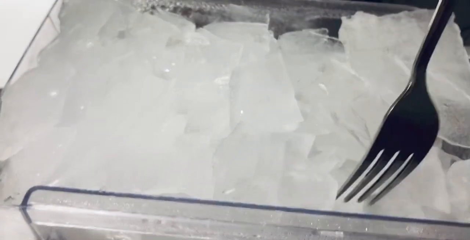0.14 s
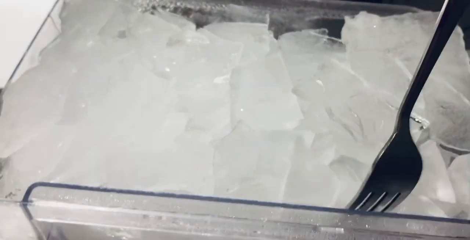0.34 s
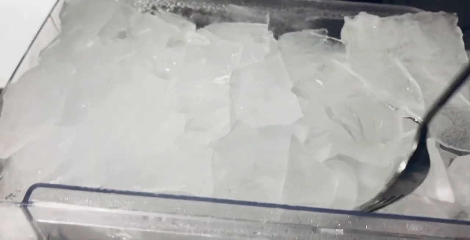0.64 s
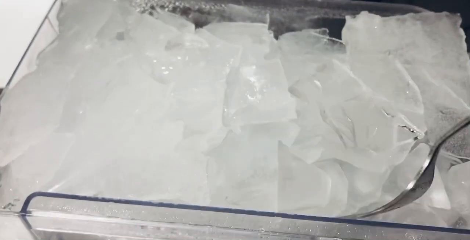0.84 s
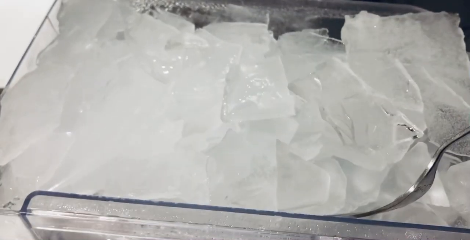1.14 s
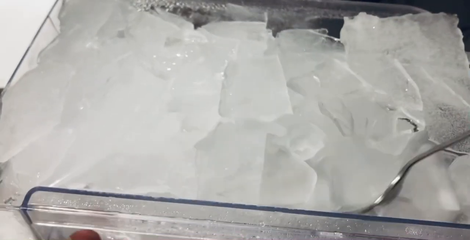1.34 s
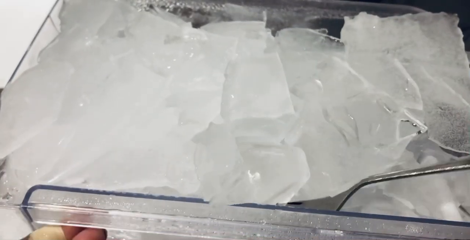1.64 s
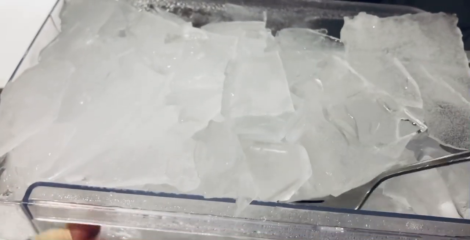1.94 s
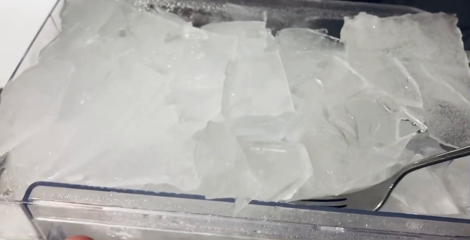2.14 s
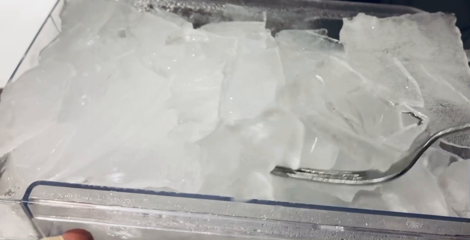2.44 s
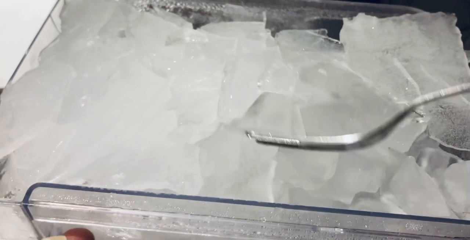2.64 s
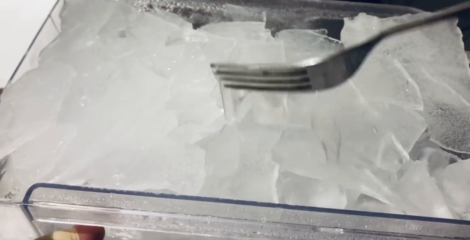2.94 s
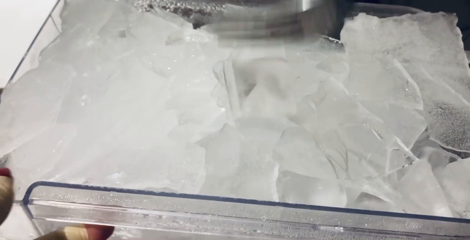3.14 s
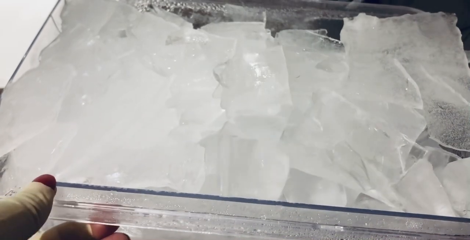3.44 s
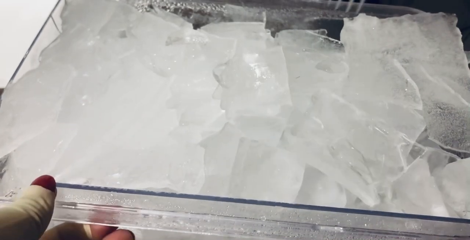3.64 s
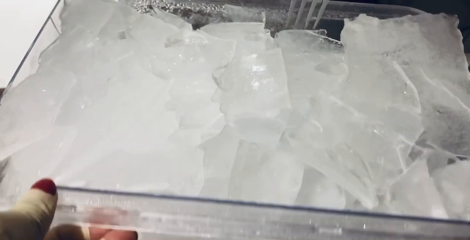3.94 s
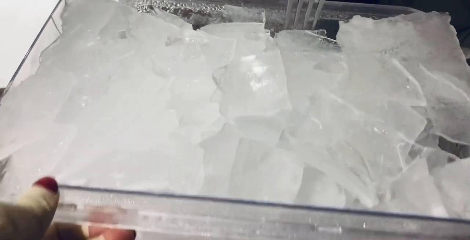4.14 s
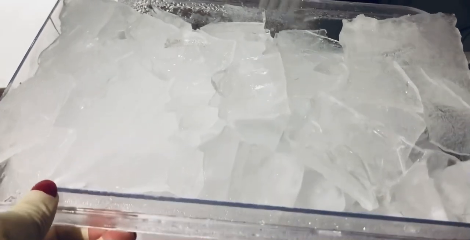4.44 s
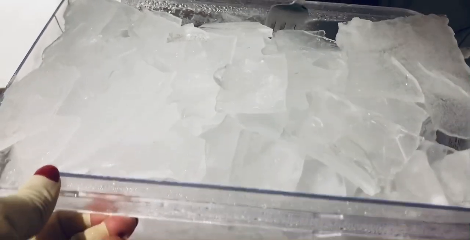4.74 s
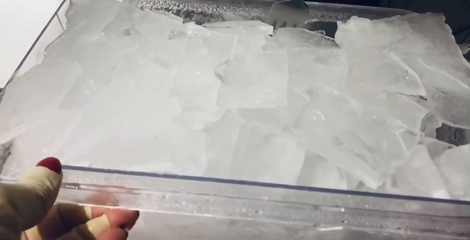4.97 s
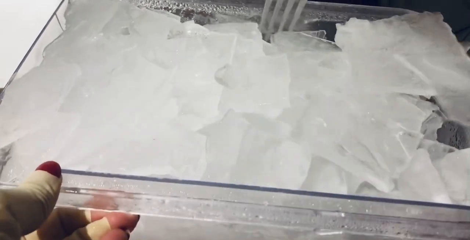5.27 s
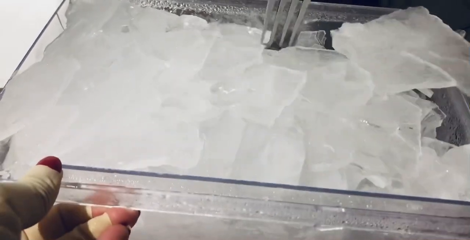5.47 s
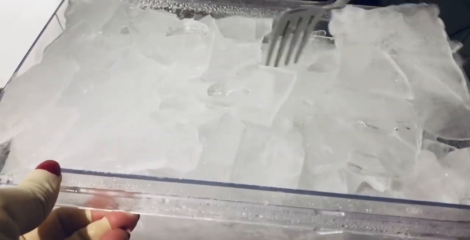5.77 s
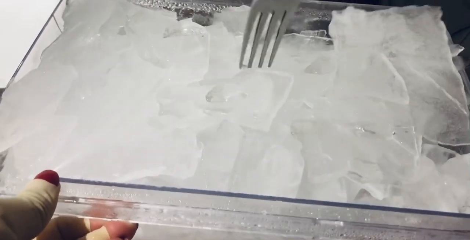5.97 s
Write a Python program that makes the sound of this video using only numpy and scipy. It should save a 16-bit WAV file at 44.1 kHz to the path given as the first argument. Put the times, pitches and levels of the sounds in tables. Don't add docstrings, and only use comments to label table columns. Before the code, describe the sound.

Ice snaps and grinds a hand's breadth from a phone microphone in a kitchen. A fork presses under slabs, cracking them in short uneven bursts with glassy pings and faint tine ringing. Loose pieces spill and thud on plastic, activity nearly stops, then loud crunching and scraping resumes to the end over faint refrigerator hum.

```python
import sys
import numpy as np
from scipy import signal
from scipy.fft import rfft, irfft
from scipy.io import wavfile

SR = 44100
rng = np.random.default_rng(int(sys.argv[2]) if len(sys.argv) > 2 else 0)


def digitize_waveform(pressure):
    field = np.atleast_2d(pressure).T
    bounded = np.clip(field, -1, 1)
    quanta = np.round(bounded * 32767).astype(np.int16)
    wavfile.write(sys.argv[1], SR, quanta)


def volts_from_decibels(level):
    exponent = np.asarray(level, float) / 20
    return 10 ** exponent


N = 269451

# f/Hz, width/Hz, level/dB
ICE_RESONANCES = [(4100, 440, 3.5), (6400, 810, 2.5), (9750, 170, 3.5), (12200, 470, -1), (16960, 4200, 5)]
# f/Hz, level/dB, t60/s
DRAWER_MODES = [(218, -24.5, 0.1), (347, -7, 0.014), (416.3, -2, 0.039), (477, 0.5, 0.027),
                (601.5, 3.5, 0.034), (623.5, 3, 0.034), (804, 4, 0.0042)]
# start t/s, end t/s, f/Hz, t60/s, level/dB
FORK_MODES = [(1.76, 2.17, 11090, .04, -27), (1.75, 2.0, 12500, .04, -25), (1.95, 2.2, 14850, .04, -24),
              (1.78, 1.82, 9400, .04, -28), (2.78, 2.87, 6430, .12, -34), (2.8, 2.87, 9880, .1, -36),
              (3.0, 3.09, 11910, .3, -30), (3.0, 3.07, 13150, .12, -29), (3.01, 3.06, 15750, .1, -28),
              (3.03, 3.09, 5050, .2, -33), (3.3, 3.5, 6400, .05, -33), (3.49, 3.6, 6400, .1, -33),
              (3.09, 3.6, 10000, .05, -30), (3.33, 3.6, 13200, .05, -28), (3.95, 4.22, 10700, .02, -27),
              (4.53, 4.61, 13200, .06, -30), (5.66, 6.0, 4650, .03, -32)]
# t/s, level/dB
WALL_GROAN = [
    (.3, -80),
    (.36, -61),
    (.54, -62),
    (.575, -44),
    (.62, -49),
    (.66, -62),
    (.95, -72),
]
GROAN_HZ = 203
# f/Hz, level per Hz/dB
ROOM_SPECTRUM = [(18, -40), (30, -10), (98, 3), (174, -22), (437, -26), (554, -31), (988, -38),
                 (16000, -56)]
ROOM_DB = -69
MICROPHONE_TOP_HZ = 15800
# t/s, f/Hz, level/dB
PING_EVENTS = [(0.625, 11250.0, -18), (1.222, 15160.0, -16.8), (1.261, 13210.0, -11), (1.307, 10000, -2),
               (1.31, 6410, -6), (1.335, 9350, -10), (1.35, 13210.0, -23.7), (2.646, 8700, -14),
               (3.655, 2530, -34), (5.085, 6440, -14), (4.483, 4100, -14), (2.286, 5750, -14),
               (2.402, 5130, -20.5), (2.461, 13900.0, -19), (2.81, 6400, -5), (2.81, 9860, -9),
               (3.091, 15400, -33), (3.609, 1480, -19), (3.609, 4290, -28), (3.611, 2840, -26),
               (3.632, 13000, -24), (3.565, 10900.0, -31), (3.854, 2700, -24), (4.541, 13210.0, -21),
               (4.812, 9170, -14.5), (6.101, 3030, -19)]
# t/s, level/dB, f/Hz
SLAB_DROPS = [(2.729, -12, 560), (3.61, -10.5, 363), (3.611, -13, 590), (3.611, -24, 970),
              (3.853, -13, 452), (3.858, -13.5, 324), (3.855, -23, 950), (.696, -24, 480), (0.76, -24, 720),
              (.759, -24, 450), (0.64, -33, 690), (1.022, -43, 740), (4.074, -33.5, 1100),
              (4.087, -39, 660), (4.9, -28, 480), (4.657, -22.5, 280), (4.499, -11, 340), (4.967, -15, 376)]
# t/s, level/dB
DRAWER_PUSH = [
    (0, -79),
    (.75, -52),
    (1.15, -62),
    (2.2, -67),
    (2.33, -54),
    (2.5, -60.5),
    (4.37, -64.5),
    (4.5, -41),
    (4.6, -62),
]
# t of most pressure/s, build-up/s,
# dying/s, grit level/dB, slab weight/dB
FORK_SHOVES = [(0.031, 0.008, 0.06, -34, 1.5), (.068, .012, .035, -35, 0), (0.271, 0.16, 0.07, -32.5, -3),
               (.616, 0.28, 0.11, -38.5, -7.5), (.701, 0.032, 0.18, -35, -11), (.92, 0.27, 0.094, -51, -6),
               (.46, .1, .2, -63, 0), (1.07, 0.13, 0.11, -57, -7.5), (1.165, 0.025, 0.45, -22, -13.5),
               (1.226, 0.045, 0.31, -17, -12.5), (1.335, 0.11, 0.048, -24.5, -8),
               (1.565, 0.13, 0.2, -30.5, -5.5), (1.772, 0.079, 0.087, -42, -7),
               (2.008, 0.16, 0.21, -46, -3), (2.301, 0.049, 0.13, -21.5, -8.5),
               (2.531, 0.067, 0.098, -35.5, -5.5), (2.809, 0.29, 0.053, -30, -6),
               (2.87, 0.055, 0.2, -47, -0.5), (3.2, 0.17, 0.47, -46.5, 3.5), (3.5, 0.48, 0.18, -48, 0.5),
               (3.64, .03, 0.11, -50, 3.5), (3.858, 0.016, 0.094, -48, 10), (4.04, 0.35, 0.15, -58, 0),
               (4.2, .15, .05, -61, 3), (4.28, .2, .3, -75, 8),
               (4.401, 0.0062, 0.18, -27.5, -9), (4.462, 0.036, 0.13, -23, -7),
              (4.686, 0.16, 0.043, -39.5, -3), (4.818, 0.078, 0.055, -28, -6),
              (4.957, 0.019, 0.096, -31.5, -6.5), (5.056, 0.054, 0.06, -19, -12.5),
              (5.274, .15, 0.16, -23, -12.5), (5.574, .3, 0.098, -37.5, -7), (4.6, .1, .25, -45, -7),
              (5.17, .25, .3, -42, -7), (5.42, .1, .1, -38, -7), (5.68, 0.029, 0.062, -29, -2.5),
              (5.745, 0.014, 0.12, -27, -6.5), (6.007, .006, .06, -40, -3), (4.91, .1, .1, -50, -3),
              (5.833, 0.12, 0.19, -33.5, -4.5), (6.105, 0.084, .1, -33.5, -10)]
SHOVE_SWING_DB = 20
SHOVE_CURVE = 1.35
DRAWER_FOLLOWS, DRAWER_DB = 1, -1
EDGE_DB, EDGE_PER_WEIGHT = -5.5, 0.33
CHIP_KNOCK_DB, CHIP_MS = -8, 5.5
# t/s, snap level/dB,
# slab level/dB, drawer knock level/dB, length/ms
SLAB_CRACKS = [(.034, -21, -26, -23.5, 20), (.0245, -25, -30, -34, 6), (0.0672, -22.5, -35, -28.5, 15),
               (0.1974, -26, -41, -23.5, 4.3), (.232, -19, -27, -37, 12), (0.2775, -18, -24, -24.5, 20),
               (0.661, -27, -43, -36.5, 22), (0.893, -48, -37, -40, 10),
               (1.0214, -34.5, -44.5, -54, 13), (1.308, -10.5, -36, -23.5, 7),
               (1.5638, -15, -20.5, -41, 20), (2.212, -18, -49, -64, 3.7), (2.2431, -24, -31, -40, 19),
               (2.4598, -26, -65, -43.5, 18), (2.504, -23.5, -69, -58, 7), (2.518, -20, -27, -52, 6),
               (2.6463, -16, -47, -27.5, 4.3), (2.7315, -17.5, -13.5, -22, 4.1),
               (2.7896, -9, -25, -38, 5.2), (2.8118, -10.5, -22.5, -31, 4.3),
               (2.8193, -12.5, -28, -37, 5.2), (2.9314, -30, -28.5, -38.5, 9.2),
               (2.9568, -15, -19, -36, 2),
               (3.0208, -27, -34, -45.5, 5), (3.092, -20, -35, -37, 3.7),
                   (3.1228, -27.5, -17.5, -25, 7.6), (3.164, -21, -30, -35.5, 13),
                   (3.1865, -17.5, -21, -45, 7.4), (3.2206, -17, -38, -61, 4), (3.2386, -7, -17.5, -53, 2),
                   (3.2501, -3, -30, -35, 2.5), (3.287, -16, -23, -47, 2.4), (3.312, -16, -13, -23, 7.5),
                   (3.3671, -15.5, -24, -44, 3.2), (3.4362, -23.5, -30, -30.5, 8.9),
                   (3.4576, -30, -35, -31, 3.7), (3.5138, -27, -22.5, -45, 1.4),
                   (3.5634, -35, -59, -50, 27), (3.6101, -16, -10, -29, 7), (3.6332, -26, -50, -54, 20),
                   (3.7637, -32, -27, -33.5, 3.1), (3.8442, -23.5, -23, -28.5, 12),
                   (3.854, -14, -16, -26.5, 12), (4.041, -46, -42, -31, 9.1), (4.392, -21, -26, -37, 24),
                   (4.414, -14, -35, -29, 2.7), (4.424, -7.5, -46, -46, 5.1),
               (4.445, -7.5, -30, -30, 21), (4.5017, -6, -11, -19, 14), (4.518, -5, -19.5, -44, 10),
                 (4.6558, -16.5, -19.5, -19, 7.8), (4.6981, -16.5, -22, -33, 7.5),
                 (4.7323, -25.5, -29.5, -57, 19), (4.7648, -20.5, -22, -28, 27),
                 (4.814, -15.5, -26, -28, 12), (4.889, -29, -42.5, -37.5, 10),
                 (4.9684, -38, -12.5, -17.5, 4.5), (5.082, -14, -45, -44, 5), (5.0887, -15, -28, -39, 10),
                 (5.2703, -12.5, -28, -48, 22), (5.3865, -15, -24, -45, 9), (5.3986, -47, -19.5, -38, 22),
                 (5.4925, -20, -31, -59, 6), (5.539, -34, -23.5, -54, 23), (5.6545, -7, -20, -24.5, 12),
                 (5.721, -15, -31, -60, 9.6), (5.8081, -12, -19.5, -42, 20), (5.8402, -8, -24, -26.5, 10),
                 (6.0151, -20.5, -22.5, -33, 25), (6.0843, -27, -40, -25, 16),
                 (6.1041, -15.5, -43, -42, 12)]
# t/s, snap level/dB, slab level/dB
SMALL_CHIPS = [(.132, -40, -34), (.142, -36, -40), (.385, -40, -60), (.41, -39, -58), (0.442, -39, -40),
               (0.5478, -30, -36), (0.5943, -29.5, -66), (0.6262, -26, -35), (0.695, -21.5, -32.5),
               (.771, -28, -33), (0.7877, -31, -51), (0.8017, -29.5, -62), (.855, -28.5, -69),
               (.8795, -32, -51), (0.9516, -44, -66), (1.062, -37, -47), (1.0917, -44, -58),
               (1.1624, -25, -35), (1.206, -10.5, -15), (1.2341, -8, -24), (1.316, -11.5, -21),
               (1.3363, -13, -19), (1.6673, -32, -30), (1.753, -27, -49), (1.822, -36, -35),
               (1.9654, -38, -40), (2.278, -16, -23), (2.3018, -7, -30), (2.31, -13, -17),
               (2.388, -21, -22.5), (2.3955, -17, -25), (2.537, -20, -26),
               (2.708, -25, -33), (3.475, -34, -25), (3.8617, -26, -40), (3.9039, -28.5, -37),
             (3.937, -36, -46), (3.961, -42, -58), (4.0742, -46, -37.5), (4.149, -52, -41.5),
             (4.2534, -48, -42.5), (4.44, -6.5, -17), (4.4647, -18, -12.5), (4.4827, -11.5, -35),
             (4.492, -13, -21), (4.5462, -17.5, -22.5), (4.6724, -23, -33), (4.749, -30, -28),
             (4.78, -20, -26), (4.7962, -22, -34), (4.836, -28, -27), (4.8728, -27.5, -45),
             (4.954, -25, -42), (4.985, -20, -43), (5.055, -15, -14.5), (5.1494, -16, -23.5),
             (5.2912, -14, -38), (5.37, -19.5, -29), (5.5807, -22, -26.5), (5.6792, -19, -20),
             (5.6852, -18, -20), (5.7815, -22, -30), (5.803, -18, -26), (6.0762, -25, -30),
             (6.094, -24, -50)]
# t/s, level/dB, centre f/Hz
SPLINTERS = [(1.1414, -26, 13800), (1.1516, -22, 10000), (1.1804, -18, 6600), (1.2246, -8, 14000),
             (1.2286, -5, 6000), (1.2595, -8, 8000), (1.2914, -14, 3000), (1.354, -12, 5500),
             (1.4034, -24, 6000), (1.4531, -21, 8640), (1.5254, -21, 3870), (1.73, -27, 13000),
             (1.7684, -24, 12000), (1.7968, -28, 10000), (1.91, -34, 14000), (1.927, -34, 12500),
             (1.9794, -30, 13000), (2.0043, -27, 10000), (2.0358, -31, 12000), (2.0414, -31, 10000),
             (2.0996, -34, 14000), (2.1241, -38, 14000), (2.7834, -15, 9000), (2.8003, -16, 6250),
             (2.8993, -32, 9000), (2.9244, -33, 3000), (3.0682, -40, 5000), (3.112, -32, 13000),
             (3.1374, -32, 12000), (3.1764, -26, 6000), (3.15, -34, 13000), (3.28, -26, 9000),
             (3.3237, -19, 6000), (3.3615, -30, 12000), (3.3937, -32, 3500), (3.4057, -30, 3390),
             (3.4146, -28, 3000), (3.469, -30, 5000), (3.4906, -32, 11000), (3.5399, -28, 8000),
             (3.5938, -36, 7000), (3.659, -38, 3000), (3.918, -27, 8000), (4.0484, -42, 3500),
             (4.0574, -42, 2230), (4.1784, -48, 2500), (4.199, -47, 2500), (4.2071, -48, 6000),
             (4.389, -20, 9350), (4.3969, -8, 12000), (4.5064, -2, 9000), (4.553, -23, 9000),
             (4.596, -28, 9000), (5.0344, -14, 8000), (5.1104, -22, 6400), (5.1946, -25, 8000),
             (5.2404, -15, 11000), (5.3413, -19, 10000), (5.3622, -16, 6730), (5.446, -25, 7160)]
TICK_WIDTH, TICK_DYING_S, TICK_DB = 1.59, 0.0017, -4.5
# t/s, level/dB
LOW_TINE_PLUCKS = [(1.572, -25), (1.5957, -28), (1.608, -25.5), (1.6586, -47), (1.7519, -35), (1.7676, -33),
                   (1.848, -51), (1.8841, -45), (1.9569, -41), (2.0048, -37), (2.061, -49), (2.0854, -47),
                   (2.1011, -41.5)]
# t/s, level/dB
MID_TINE_PLUCKS = [(1.6633, -38), (1.7241, -47), (1.7523, -32), (1.8486, -55), (1.8833, -55), (1.9297, -47),
                   (1.9561, -39), (1.9945, -45), (2.009, -41), (2.085, -51), (2.1741, -56)]
# t/s, level/dB
HIGH_TINE_PLUCKS = [(1.5633, -28), (1.5862, -25), (1.6676, -40), (1.7324, -42), (1.7514, -37),
                    (1.7723, -37), (1.7968, -36), (1.8591, -50), (1.9095, -38), (1.962, -27), (1.9973, -37),
                    (2.0128, -37), (2.0427, -36), (2.0836, -43), (2.1245, -40)]
# f/Hz, t60/s, level/dB
TINE_MODES = [(11090, 0.054, -15), (12480, .07, -15), (14850, 0.036, -13)]
CATCH_SHIFT = 9973
CRACK_SHAKE = 0.15
SLIP_LIMIT = 2.5


def rms_one(x):
    return x / np.sqrt(np.mean(x ** 2) + 1e-20)


def in_time(rows):
    s, *columns = np.transpose(rows)
    return [np.interp(np.arange(N) / SR, s, c) for c in columns]


def place(out, s, sound):
    i = round(s * SR)
    out[i:i + len(sound)] += sound[:len(out) - i]


def band(x, low_hz, high_hz):
    sos = signal.butter(2, [low_hz, min(high_hz, .45 * SR)], "band", fs=SR, output="sos")
    return signal.sosfilt(sos, x + 1e-18)


def ring(x, hz, t60):
    r, w = volts_from_decibels(-60 / (t60 * SR)), 2 * np.pi * hz / SR
    return signal.lfilter([0, np.sin(w)], [1, -2 * r * np.cos(w), r * r], x + 1e-18)


def body(x, modes):
    return sum((-1) ** k * volts_from_decibels(db) * ring(x, hz, t60) for k, (hz, db, t60) in enumerate(modes))


def fractures(per_s, spread_db):
    sizes = volts_from_decibels(spread_db * np.minimum(rng.exponential(1, N), 5)) * rng.choice([-1, 1], N)
    return rms_one(sizes * (rng.random(N) < per_s / SR))


def swell(clicks, rise_s, t60):
    t = np.arange(SR // 8) / SR
    shape = (1 - np.exp(-t / rise_s)) * volts_from_decibels(-60 * t / t60)
    return np.abs(signal.fftconvolve(clicks, shape / shape.max())[:N])


def slips(per_s, spread_db, t60, steady):
    clicks = np.abs(fractures(per_s, spread_db))
    jumps = rms_one(swell(clicks, .0015, t60))
    return rms_one(steady + SLIP_LIMIT * np.tanh(jumps / SLIP_LIMIT))


def bursts(times, db, lengths_s, fall):
    lead = 500
    out, t = np.zeros(N + 4000), np.arange(-lead, 3500) / SR
    for s, top_db, length in zip(times, db, lengths_s):
        build_up = np.exp(-(t / (0.27 * length)) ** 2)
        shape = np.where(t < 0, build_up, np.exp(-t / (fall * length)))
        place(out, s, volts_from_decibels(top_db) * shape)
    return out[lead:N + lead]


def ice_colour(x):
    for hz, width, db in ICE_RESONANCES:
        b, a = signal.iirpeak(hz, hz / width, fs=SR)
        x = x + (volts_from_decibels(db) - 1) * signal.lfilter(b, a, x)
    return x


def slab_sound(x):
    b, a = signal.iirpeak(1450, 5, fs=SR)
    return 3.0 * band(x + .6 * signal.lfilter(b, a, x), 750, 3000)


def room():
    hz, db = np.transpose(ROOM_SPECTRUM)
    f = np.maximum(np.arange(N // 2 + 1) * SR / N, 1)
    colour = volts_from_decibels(np.interp(np.log(f), np.log(hz), db))
    return rms_one(irfft(rfft(rng.standard_normal(N)) * colour, N)) * volts_from_decibels(ROOM_DB)


def push_rumble():
    push_db, = in_time(DRAWER_PUSH)
    return rms_one(band(rng.standard_normal(N), 64, 230)) * volts_from_decibels(push_db)


def shoves():
    t, power = np.arange(0, N + 64, 64) / SR, 1e-10
    for s, build_s, die_s, db, weight_db in FORK_SHOVES:
        distance = np.where(t < s, (s - t) / build_s, (t - s) / die_s)
        level_db = db - SHOVE_SWING_DB * distance ** SHOVE_CURVE
        shares_db = np.array([[0], [weight_db], [DRAWER_FOLLOWS * weight_db + DRAWER_DB]])
        power = power + volts_from_decibels(2 * (level_db + shares_db))
    return in_time(np.vstack([t, 10 * np.log10(power)]).T)


def flecks(pressure):
    pitches = np.geomspace(3300, 15600, 22) * rng.uniform(.96, 1.04, 22)
    return rms_one(sum(ring(fractures(per_s=14, spread_db=2.5) * pressure, hz, 0.06) for hz in pitches))


def grit_sound():
    together, out = slips(per_s=260, spread_db=2.0, t60=.016, steady=1.0), 0
    edges = np.geomspace(2600, 18000, 9)
    for low, high in zip(edges, edges[1:]):
        alone = slips(per_s=60, spread_db=4.5, t60=0.01, steady=1.9)
        out = out + band(fractures(per_s=9100, spread_db=3.5) * alone, low, high)
    return together, rms_one(out * together) + .32 * flecks(together)


def grinding():
    grit_db, slab_db, drawer_db = shoves()
    pressure, shards = grit_sound()
    grains = fractures(per_s=14000, spread_db=4.5) * pressure
    grit = rms_one(ice_colour(shards)) * volts_from_decibels(grit_db + 1.0)
    slab_slips = slips(per_s=69, spread_db=5.5, t60=0.037, steady=2.3)
    slab = rms_one(slab_sound(grains * slab_slips)) * volts_from_decibels(slab_db - 0.5)
    drawer_ring = rms_one(body(grains, DRAWER_MODES))
    drawer_rub = rms_one(band(grains, 252, 1570))
    drawer = rms_one(drawer_ring + 1.04 * drawer_rub) * volts_from_decibels(drawer_db + 3.5)
    return grit + slab + drawer, grains * volts_from_decibels(grit_db)


def cracks():
    chips = [(s, snap, slab, slab + CHIP_KNOCK_DB, CHIP_MS) for s, snap, slab in SMALL_CHIPS]
    events = SLAB_CRACKS + chips
    s, snap_db, slab_db, knock_db, length_ms = np.transpose(events)
    length = 0.00065 + 0.0004 * np.maximum(length_ms, 1)
    edge_db = EDGE_DB + EDGE_PER_WEIGHT * (snap_db - slab_db)
    breaks = fractures(per_s=22000, spread_db=0.5)
    snap = band(breaks * bursts(s, snap_db + 3.0, length, fall=0.48), 2170, 9260)
    edge = band(breaks * bursts(s, snap_db + edge_db + 5.0, length, fall=0.16), 6840, 15300)
    slab = slab_sound(breaks * bursts(s + 0.00064, slab_db - 4.0, length, fall=0.98))
    knock = body(breaks * bursts(s + 0.00068, knock_db - 15.5, length, fall=0.64), DRAWER_MODES)
    return ice_colour(snap + edge) + slab + knock


def groan():
    level_db, = in_time(WALL_GROAN)
    return np.sin(2 * np.pi * GROAN_HZ * np.arange(N) / SR) * volts_from_decibels(level_db + 3)


def pings():
    out, t = np.zeros(N), np.arange(2500) / SR
    for s, hz, db in PING_EVENTS:
        envelope = (1 - np.exp(-t / .001)) * volts_from_decibels(db - 60 * t / .03)
        place(out, s, np.sin(2 * np.pi * hz * t) * envelope)
    return out


def thuds():
    out, t = np.zeros(N), np.arange(4000) / SR
    for s, db, hz in SLAB_DROPS:
        envelope = (1 - np.exp(-t / 0.0028)) * volts_from_decibels(db + 5.0 - 60 * t / 0.025)
        place(out, s, np.sin(2 * np.pi * hz * t) * envelope)
    return out


def ticks():
    out, t = np.zeros(N), np.arange(800) / SR
    shape = (1 - np.exp(-t / 0.00035)) * np.exp(-t / TICK_DYING_S)
    for s, db, hz in SPLINTERS:
        hiss = rng.standard_normal(800)
        snap = band(hiss * shape, hz / TICK_WIDTH, hz * TICK_WIDTH)
        place(out, s, snap / np.abs(snap).max() * volts_from_decibels(db + TICK_DB))
    return out


def tines():
    out = 0
    for plucks, (hz, t60, db) in zip([LOW_TINE_PLUCKS, MID_TINE_PLUCKS, HIGH_TINE_PLUCKS], TINE_MODES):
        s, pluck_db = np.transpose(plucks)
        flicks = bursts(s, pluck_db + db, np.full(len(s), .003), fall=0.63)
        out = out + ring(rng.standard_normal(N) * flicks, hz, t60)
    return out


def fork(scrape):
    t, out = np.arange(N) / SR, 0
    catches = slips(per_s=70, spread_db=3.0, t60=.012, steady=.7)
    for k, (start, end, hz, t60, db) in enumerate(FORK_MODES):
        free = (t > start) * (t < end)
        drive = scrape * np.roll(catches, k * CATCH_SHIFT) * free
        out = out + volts_from_decibels(db) * ring(drive, hz, t60)
    return out


def scene():
    rub, scrape = grinding()
    snaps = cracks()
    ice = rub + snaps + pings() + thuds() + ticks()
    near = ice + push_rumble() + groan() + tines() + fork(scrape + CRACK_SHAKE * snaps)
    t = np.arange(SR // 10) / SR
    walls = rng.standard_normal(len(t)) * volts_from_decibels(-60 * t / .08 - 44) * (t > .003)
    return (near + signal.fftconvolve(near, walls)[:N] + room())[None]


def band_limit(x):
    return signal.sosfilt(signal.butter(12, 17010, fs=SR, output="sos"), x)


def record(dry):
    fade = np.clip((np.arange(N) / SR - .002) / 0.0022, 0, 1)
    rounded = .7 * np.tanh(dry * fade / .7)
    thin = signal.sosfilt(signal.butter(2, 60, "high", fs=SR, output="sos"), rounded)
    top_cut = signal.ellip(10, .5, 46, MICROPHONE_TOP_HZ, fs=SR, output="sos")
    return band_limit(signal.sosfilt(top_cut, thin))


dry = scene()
out = record(dry)
digitize_waveform(out)
```